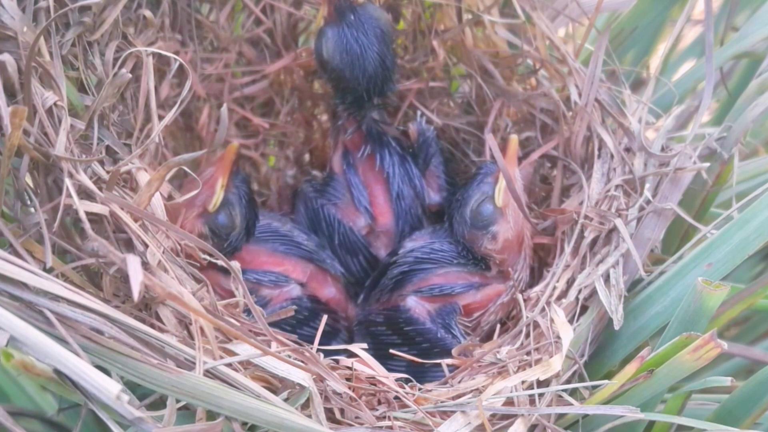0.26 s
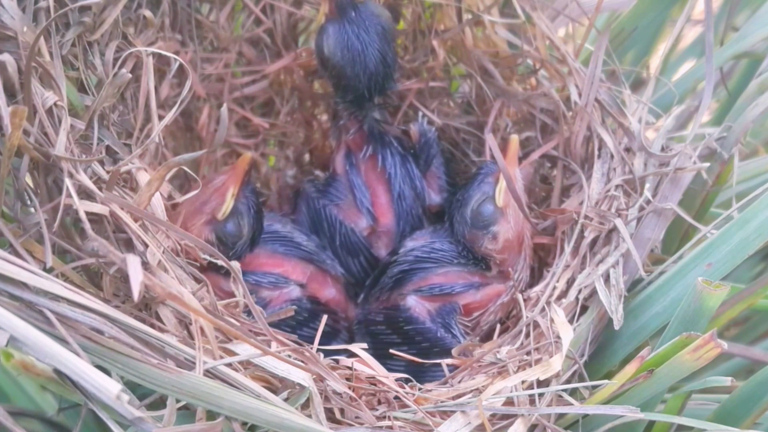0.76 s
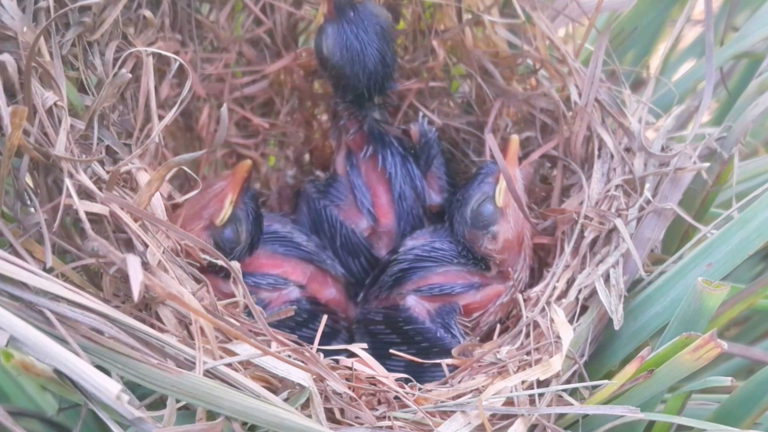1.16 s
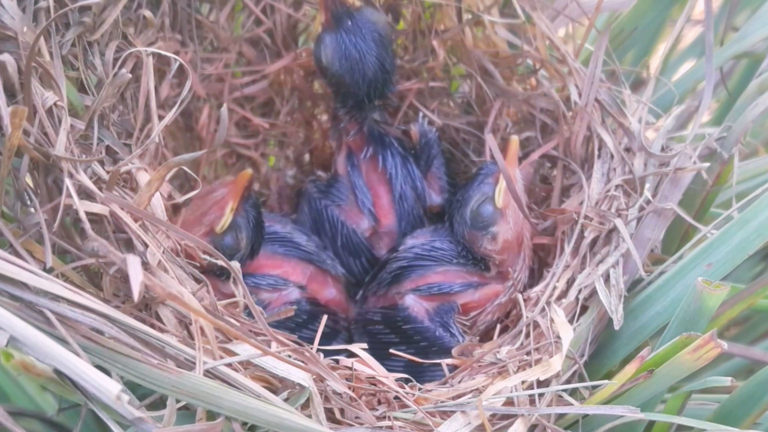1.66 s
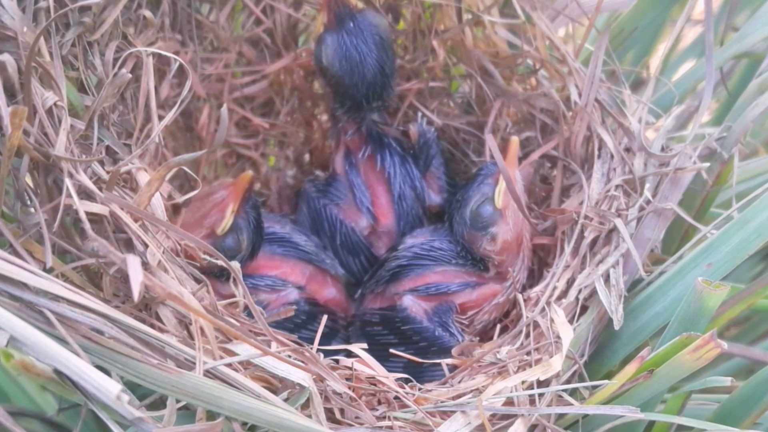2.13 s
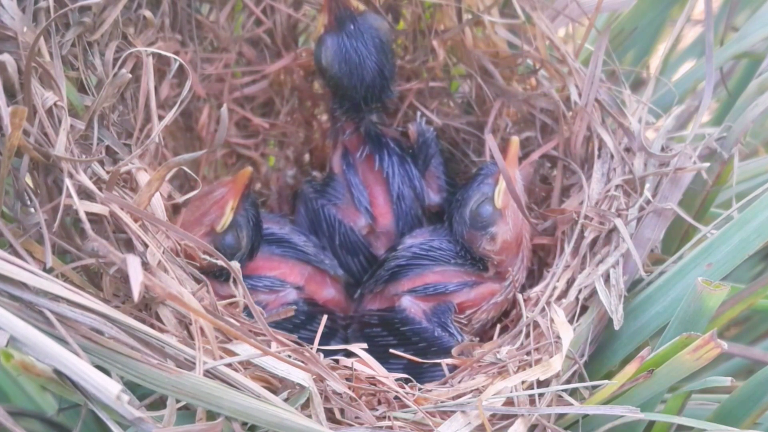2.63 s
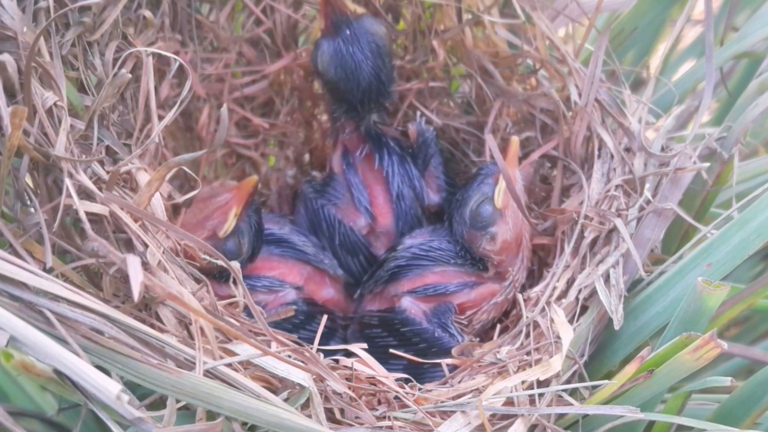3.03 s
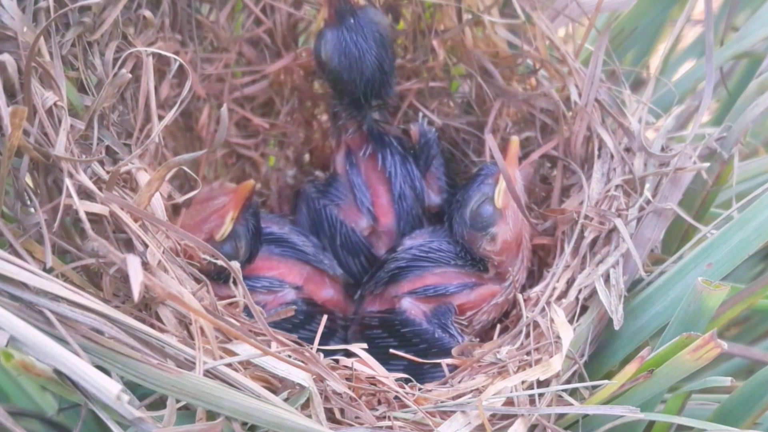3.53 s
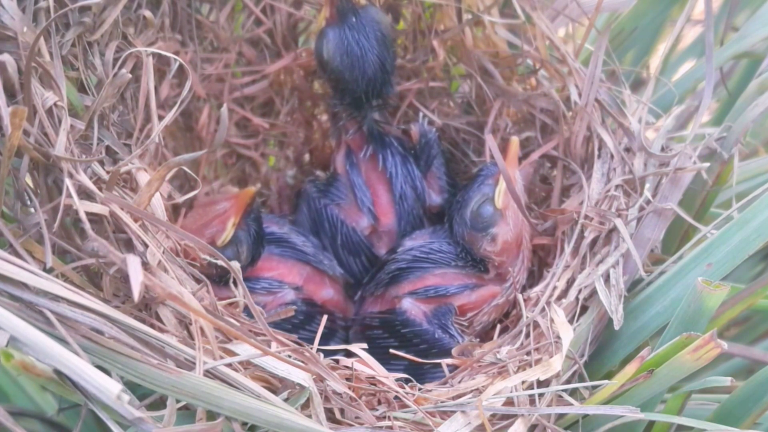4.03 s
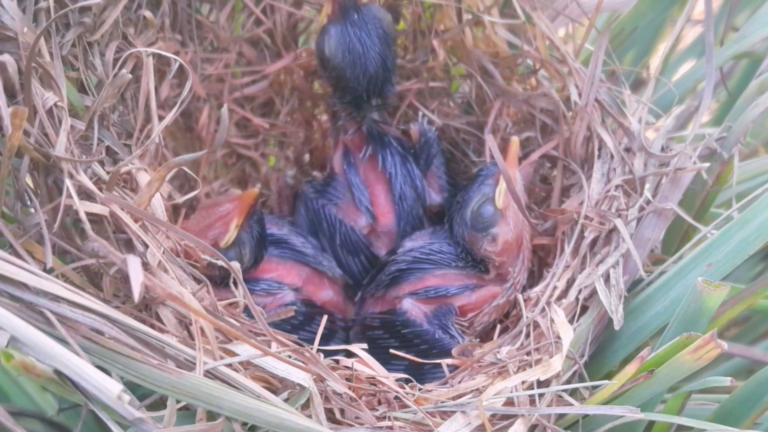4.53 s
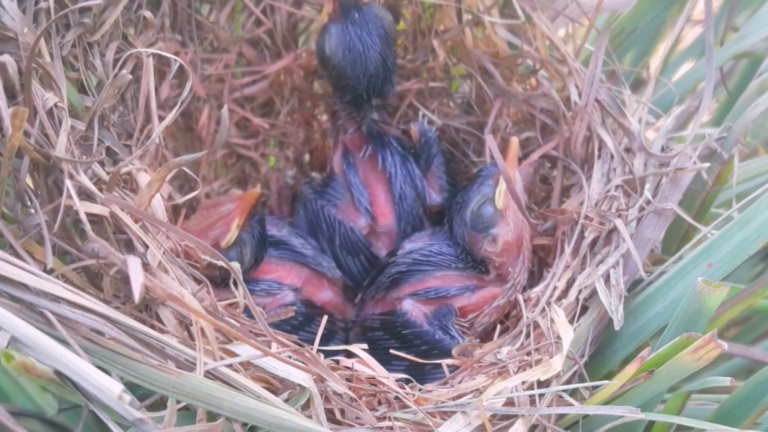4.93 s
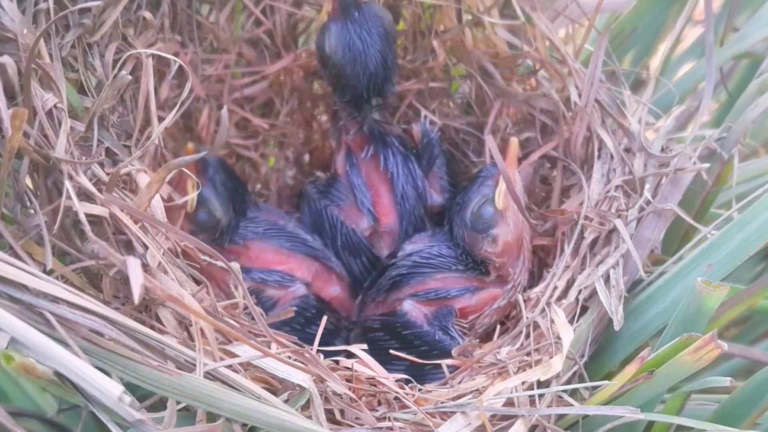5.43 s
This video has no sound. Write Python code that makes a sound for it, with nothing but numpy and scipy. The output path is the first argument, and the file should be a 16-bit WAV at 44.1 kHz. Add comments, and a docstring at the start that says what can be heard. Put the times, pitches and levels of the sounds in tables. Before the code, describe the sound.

A soft, patchy outdoor rush with low fading road noise, a very faint engine thudding about fourteen times a second and thin insect hiss. At 0.1-0.2 s dry stems snap and tiny bubbles pop; weak double peeps run from 0.3 to 0.7 s beside a light leaf brush. Quick high bird chirps glide and tumble at about 0.9, 1.6, 2.5, 3.2-3.4, 4.2 and 4.9 s. From 1.4 to 2.3 s a low, drawn-out bullfrog groan swells, pulsing and nasal, turning rough as it sags. Barely audible breathy hoots follow at 2.3-3.7 s, with a faint insect buzz from 2.9 to 3.7 s. A small frog gives short throbbing mid-pitched plucks at 4.2 and 4.5 s. Dull bumps, a snap and a scuff come at 4.7-5.0 s. A nearer, louder, shorter groan sounds from 5.16 to 5.53 s, breaking roughly and echoing off the bank.

```python
"""Bullfrog at the marsh edge

By a bird's nest a bullfrog groans twice, harmonics of a vocal pulse shaped by chest and mouth; a smaller
frog plucks throbbing sines. Small birds whistle short glides in the reeds, insects buzz and trill as struck
resonances, bubbles pop as climbing sines, dry stems snap as bursts of noise. Far off a slow engine thuds and
faint breathy hoots swell, over band noise for the rush of air and a fading road.
"""
import sys
import numpy as np
from scipy import signal
from scipy.io import wavfile
from scipy.ndimage import uniform_filter1d

SR = 44100
rng = np.random.default_rng(int(sys.argv[2]) if len(sys.argv) > 2 else 0)


def master(y):
    """Save y as 16-bit WAV."""
    cut = np.clip(np.atleast_2d(y).T, -1, 1)
    pcm = np.round(cut * 32767)  # scale
    wavfile.write(sys.argv[1], SR, pcm.astype(np.int16))


N = 250929
TIME = np.arange(N) / SR   # s


def from_db(db):
    """Decibels to gain."""
    return 10 ** (np.asarray(db) / 20)


def rms_one(x):
    """Scale to unit rms."""
    return x / np.sqrt(np.mean(x ** 2) + 1e-20)


def in_time(rows, t):
    """Each column of a curve table at times t."""
    s, *columns = np.transpose(rows)
    return [np.interp(t, s, c) for c in columns]


def at_hz(points, hz):
    """A spectrum table read on a log-frequency axis."""
    point_hz, point_db = np.transpose(points)
    return np.interp(np.log(hz), np.log(point_hz), point_db)


def band_pass(x, order, low_hz, high_hz):
    """Keep what lies between two frequencies."""
    return signal.sosfilt(signal.butter(order, [low_hz, high_hz], "band", fs=SR, output="sos"), x)


def high_pass(x, order, hz):
    """Keep what lies above a frequency."""
    return signal.sosfilt(signal.butter(order, hz, "high", fs=SR, output="sos"), x)


def drift(rate_hz, size=N):
    """Slow random wander of spread 1: noise smoothed at a twentieth of the sample rate."""
    r = np.exp(-40 * np.pi * rate_hz / SR)
    slow = signal.lfilter([1], [1, -2 * r, r * r], rng.standard_normal(size // 20 + 4002))
    settled = rms_one(slow[2000:])[2000:]
    return np.interp(np.arange(size) / 20, np.arange(size // 20 + 2), settled)


def ring(clicks, hz, t60):
    """A unit click sets a sine of height 1 ringing; it falls 60 dB in t60 seconds."""
    r, w = from_db(-60 / (t60 * SR)), 2 * np.pi * hz / SR
    return signal.lfilter([0, np.sin(w)], [1, -2 * r * np.cos(w), r * r], clicks + 1e-18)


def train(times, sizes):
    """Clicks at the given times."""
    out = np.zeros(N)
    np.add.at(out, np.clip(np.asarray(times) * SR, 0, N - 1).astype(int), sizes)
    return out


SMOOTH_ABOVE_HZ, SMOOTH_SHARE = 7500, 0.54   # the finest hiss flickers less


def rush(spectrum, patchiness):
    """Noise in third-octave bands, each flickering a little, partly together; rms 1."""
    out, together = 0, drift(24)
    edges = 25 * 2 ** (np.arange(29) / 3)
    edges = edges[edges < 1.4 * spectrum[-2][0]]
    white = rng.standard_normal((2, N))
    for k, (low, high) in enumerate(zip(edges, edges[1:])):
        band = band_pass(white[k % 2], 2, low, high)
        share = SMOOTH_SHARE if low > SMOOTH_ABOVE_HZ else 1
        flicker_db = patchiness * share * (0.38 * together + 0.27 * drift(41))
        out = out + band * from_db(at_hz(spectrum, np.sqrt(low * high)) + flicker_db)
    return rms_one(out)


# colour of the rush of air: (frequency [Hz], relative density [dB per Hz])
AIR_SPECTRUM = [(24, -35), (40, -2.5), (118, 1.5), (320, -11), (918, -18.5), (1180, -26), (2570, -23.5),
                (4000, -26), (5050, -29.5), (6820, -41.5), (8550, -37.5), (14800, -31.5), (16000, -44)]
AIR_DB = -55.5


def moving_air():
    """A steady, patchy rush of noise all around."""
    return from_db(AIR_DB) * rush(AIR_SPECTRUM, patchiness=7.0)


# colour of the road: (frequency [Hz], relative density [dB per Hz])
ROAD_SPECTRUM = [(24, -41), (40, -13), (161, 0), (334, -7.5), (973, -12), (1460, -17), (5000, -32.5),
                 (6500, -45), (11000, -120)]
# background levels: (time [s], road level [dB], insect chorus level [dB])
BACKGROUND = [(0, -45, -66), (.5, -50.5, -61.5), (1.3, -48.5, -64.5), (2.9, -51, -65.5),
              (3.9, -59.5, -67.5), (5.69, -52, -64.5)]


def road():
    """Low band noise whose level fades and returns."""
    return from_db(in_time(BACKGROUND, TIME)[0]) * rush(ROAD_SPECTRUM, patchiness=3.0)


def chorus():
    """Many far insects: dense uneven clicks in a broad band."""
    chance = 5000 * from_db(3.0 * drift(25)) / SR   # about 5000 clicks a second
    clicks = (rng.random(N) < chance) * rng.standard_normal(N)
    return from_db(in_time(BACKGROUND, TIME)[1]) * rms_one(band_pass(clicks, 3, 5650, 7550))


THUDS_PER_S, THUD_FIRST_S, THUD_DB = 14.09, 0.04276, -55


def engine():
    """Far away, one low exhaust thud per firing: a soft push rings two low resonances."""
    at = np.arange(THUD_FIRST_S, N / SR, 1 / THUDS_PER_S)
    firings = train(at, from_db(3 * rng.standard_normal(len(at))))
    push = signal.lfilter(np.hanning(300), [1], firings)
    return from_db(THUD_DB) * rms_one(ring(push, 95.0, 0.068) + 0.49 * ring(push, 165.0, 0.047))


# faint breathy hoots far off: (from [s], to [s], pitch [Hz], level at the crest [dB])
HOOTS = [(2.348, 3.062, 622, -60), (3.19, 3.723, 439, -58)]


def hoots():
    """Noise in a narrow resonance, swelling and fading."""
    out, air = 0, rng.standard_normal(N)
    for begin, end, hz, level_db in HOOTS:
        swell = np.sqrt(np.clip(4 * (TIME - begin) * (end - TIME) / (end - begin) ** 2, 0, 1))
        out = out + from_db(level_db) * swell * rms_one(ring(air, hz, 0.083))
    return out


# a bush cricket's long buzz: (from [s], to [s])
BUZZ_SPAN = (2.912, 3.726)
# wing resonances, each passed twice: (frequency [Hz], level [dB], t60 of one pass [s])
WING_MODES = [(6760, 0, .013), (6080, -11, .007), (5420, -17, .007), (10700, -21, .009), (3400, -13, .01)]
BUZZ_DB = -57.5


def bush_cricket():
    """The buzz comes in triplets of soft tooth strikes, each ringing in the wing."""
    groups = np.arange(BUZZ_SPAN[0], BUZZ_SPAN[1], .0172)
    jitter = .0007 * rng.standard_normal((len(groups), 3))   # s
    at = (groups[:, None] + [0, .0052, .0104] + jitter).ravel()
    strikes = train(at, from_db(1.5 * rng.standard_normal(len(at))))
    buzz = sum(from_db(level_db) * rms_one(ring(ring(strikes, hz, t60), hz, t60))
               for hz, level_db, t60 in WING_MODES)
    duty = np.sqrt((BUZZ_SPAN[1] - BUZZ_SPAN[0]) * SR / N)   # so that the level holds while it buzzes
    return from_db(BUZZ_DB) * duty * rms_one(buzz)


# loudness of the trill: (time [s], level [dB])
TRILL_LEVEL = [(0, -82), (1.05, -86), (1.2, -110), (3.5, -110), (3.62, -86), (4, -92), (5.69, -80)]


def trill():
    """Bursts of six fast pulses ring one high resonance."""
    bursts = np.arange(.06, N / SR, 1 / 11.81)
    pulses = train((bursts[:, None] + np.arange(6) / 133).ravel(), 1)
    return from_db(in_time(TRILL_LEVEL, TIME)[0]) * rms_one(ring(pulses, 9220, 0.017))


# dry stems snap: (time [s], level before the band filter [dB], fall to 1/e [s])
SNAPS = [(.092, -49.5, 0.014), (.2, -51, 0.0076), (.8689, -56, .003), (2.837, -54, .003),
         (4.812, -52, .002), (4.819, -43, .002)]
# leaves brush: (from [s], to [s], level before the filter [dB])
BRUSH = (0.48, .68, -68)
# something scuffs dully: (time [s], length [s], level [dB])
SCUFF = (4.928, 0.051, -51)
# soft low bumps: (time [s], peak level [dB])
BUMPS = [(1.332, -42), (1.396, -38), (4.722, -36), (4.75, -30)]


def rustles():
    """Close to the microphone: bright noise snaps, a brush of leaves, a scuff and dull ringing bumps."""
    snaps = sum(from_db(level_db) * (TIME > s) * np.exp(-np.maximum(TIME - s, 0) / fade_s)
                for s, level_db, fade_s in SNAPS)
    snaps = band_pass(snaps * rng.standard_normal(N), 2, 2500, 9000)
    begin, end, brush_db = BRUSH
    brush = (TIME > begin) * (TIME < end) * from_db(brush_db + 3.3 * drift(60))
    brush = high_pass(brush * rng.standard_normal(N), 2, 5500)
    start, length, scuff_db = SCUFF
    swell = np.sin(np.pi * np.clip((TIME - start) / length, 0, 1))
    scuff = from_db(scuff_db) * swell * rms_one(band_pass(rng.standard_normal(N), 3, 300, 2600))
    bump_s, bump_db = np.transpose(BUMPS)
    return snaps + brush + scuff + ring(train(bump_s, from_db(bump_db)), 148, 0.026)


# small bubbles burst in the water: (time [s], first pitch [Hz], level [dB])
BUBBLES = [(0.097, 914, -42.5), (0.164, 935, -50), (2.514, 555, -45)]
BUBBLE_S, BUBBLE_RISE = .008, 0.41   # length; share by which the pitch climbs


def bubbles():
    """Each bubble is a short sine that climbs."""
    out, u = np.zeros(N), np.linspace(0, 1, int(BUBBLE_S * SR))
    swell = np.sqrt(np.sin(np.pi * u ** .5).clip(0))
    for s, hz, level_db in BUBBLES:
        tone = np.sin(2 * np.pi * np.cumsum(hz * (1 + BUBBLE_RISE * u)) / SR)
        out[int(s * SR):][:len(u)] += from_db(level_db) * swell * tone
    return out


# bird levels are set at 3 kHz, before a common 3 dB lift
# single glides, lone peeps and the short rising flicks before a tumble's shaking fall:
# (time [s], length [s], first pitch [Hz], last pitch [Hz], level [dB])
SINGLE_GLIDES = [(.075, 0.061, 3680, 3560, -65), (1.072, .022, 3140, 2750, -62),
                 (2.424, 0.037, 3270, 2740, -63.5), (2.566, .012, 3140, 4320, -51),
                 (2.705, 0.025, 3570, 2850, -59.5), (2.974, 0.025, 3720, 2950, -59),
                 (3.303, .015, 3200, 3090, -60.5), (3.35, 0.013, 3650, 3950, -55),
                 (3.68, .04, 3250, 2570, -58), (4.23, 0.0083, 3360, 4440, -49),
                 (4.852, 0.046, 3400, 2900, -59), (4.919, 0.026, 2900, 2450, -63),
                 (4.948, 0.026, 2125, 2405, -58), (5.642, 0.056, 3830, 3080, -59)]
# the shaking fall that ends each tumble: (time [s], length [s], first pitch [Hz], last pitch [Hz], level [dB])
WARBLES = [(0.954, 0.021, 3360, 2890, -51), (2.576, 0.016, 3170, 2820, -53.5),
           (3.366, 0.024, 3200, 2760, -53), (4.242, .027, 3606, 2800, -48)]
# a call of two arches, each a list of: (time after the start [s], pitch [Hz])
TWO_ARCHES = [
    [(.002, 3900), (.006, 5650), (.011, 6800), (.015, 5600), (.017, 4500), (.02, 3850)],
    [(.032, 3850), (.039, 4600), (.043, 5700), (.047, 4550), (.053, 4100), (.063, 2700)],
]
# arched calls: (time [s], stretch in time [ratio], first arch level [dB], second arch level [dB])
ARCH_CALLS = [(.193, .95, -57, -51), (1.579, .99, -56, -52), (3.158, 1.0, -57, -57), (4.859, .96, -52, -53)]
# strokes of two more calls, times before stretching: (time after the start [s], length [s],
# turn [share of length], first pitch [Hz], turning pitch [Hz], last pitch [Hz], level within the call [dB])
TUMBLE = [(0, 0.016, 0.394, 3900, 6890, 3900, 0), (.016, 0.0113, 0.38, 3680, 4676, 3460, 0)]
DOUBLE_PEEP = [(0, .02, 0.36, 3930, 3370, 2810, 0.13), (.019, 0.0153, 0.38, 4320, 3410, 2670, -1)]
# where those calls sound: (time [s], level [dB], stretch in time [ratio])
TUMBLE_CALLS = [(0.918, -52, 0.93), (2.529, -53, 1.07), (3.326, -55.5, 1.05), (4.205, -54, 0.83)]
DOUBLE_CALLS = [(.325, -62, 0.81), (.396, -61.5, 0.88), (0.456, -57.5, 0.97), (.528, -57.5, 0.98),
                (.583, -57, 0.93), (.66, -58.5, 0.8)]
WARBLE_HZ, WARBLES_PER_S = 314, 141   # depth and rate of the shake
DULLING_DB = -2.5   # per octave above 3 kHz: a note swells as it falls


def bird_notes():
    """Every note as start, times after it, pitches at those times, level and depth of shake."""
    notes = [(s, [0, length], [a, b], level_db, 0) for s, length, a, b, level_db in SINGLE_GLIDES]
    notes += [(s, [0, length], [a, b], level_db, WARBLE_HZ) for s, length, a, b, level_db in WARBLES]
    for s, stretch, *levels in ARCH_CALLS:
        for level_db, path in zip(levels, TWO_ARCHES):
            times, path_hz = np.transpose(path)
            notes.append((s, stretch * times, path_hz, level_db, 0))
    for strokes, calls in [(TUMBLE, TUMBLE_CALLS), (DOUBLE_PEEP, DOUBLE_CALLS)]:
        for s, level_db, stretch in calls:
            for late, length, turn, *glide_hz, stroke_db in strokes:
                times = stretch * (late + length * np.array([0, turn, 1]))
                notes.append((s, times, glide_hz, level_db + stroke_db, 0))
    return notes


def birds():
    """Whistled glides in the reeds, slightly hoarse; each kind of call repeats its strokes."""
    out = np.zeros(N)
    hoarse = 1 + .12 * drift(70) + .42 * drift(300)
    quaver = 1 + .035 * drift(250)   # the pitch is unsteady
    for start, times, path_hz, level_db, shake_hz in bird_notes():
        first, length = int((start + times[0]) * SR), times[-1] - times[0]
        u = np.linspace(0, 1, int(length * SR))[:N - first]
        hz = np.interp(times[0] + length * u, times, path_hz)
        hz = hz + shake_hz * np.sin(2 * np.pi * WARBLES_PER_S * length * u)
        hz = hz * quaver[first:][:len(u)]
        loud = from_db(level_db + 3 + DULLING_DB * np.log2(hz / 3000))
        swell = np.sin(np.pi * u) ** .5
        out[first:][:len(u)] += loud * swell * np.sin(2 * np.pi * np.cumsum(hz) / SR)
    return out * hoarse


# small frog's notes: (time [s], level [dB], overtone against the note [dB])
PLUCKS = [(4.224, -44, -14), (4.524, -46, -27)]
# its note, then its overtone: (frequency [Hz], t60 of the breath in it [s])
PLUCK_MODES = [(1408, 0.064), (2660, .04)]
PLUCK_HOLD_S, PLUCK_T60_S = 0.022, 0.21   # the note holds, then dies


def small_frog():
    """The note throbs 58 times a second, holds and dies; the overtone comes later."""
    out, air = 0, rng.standard_normal(N)
    for s, level_db, overtone_db in PLUCKS:
        for (hz, t60), late, share_db in zip(PLUCK_MODES, [0, .042], [0, overtone_db]):
            age = np.maximum(TIME - s - late, 0)
            fall = from_db(-60 * np.maximum(age - PLUCK_HOLD_S, 0) / PLUCK_T60_S)
            throb = 1 - .4 * np.cos(2 * np.pi * 58 * age)
            push = np.tanh(age / .005) * fall * throb
            tone = np.sin(2 * np.pi * hz * TIME) + .15 * rms_one(ring(air, hz, t60))
            out = out + from_db(level_db + share_db) * push * tone
        # a breathy onset across the mids
        puff = (TIME > s) * from_db(-60 * np.maximum(TIME - s, 0) / 0.35)
        out = out + from_db(level_db - 7.0) * puff * rms_one(ring(air, 1620, 0.0047))
    return out


# the farther and the nearer bullfrog groan: (start [s], held pitch [Hz], rise time [s],
# sag after one second [Hz], pitch jumps at [s], jump [Hz], voice breaks at [s],
# throat resonance that opens after the break [Hz], its height [dB], resting centre of the mouth resonance [Hz],
# resonance heard as the mouth first opens [Hz], its height [dB])
GROAN_FAR = (1.38, 79.7, .07, 17.5, 2, 0.345, 2.02, 880, 3.7, 1270, 1210, 3)
GROAN_NEAR = (5.162, 83.4, 0.0375, 170, 5.35, 3.9, 5.42, 660, 14, 1013, 1345, 21)
# effort of each groan: (time [s], chest level [dB], mouth level [dB], centre of the mouth resonance [Hz])
EFFORT_FAR = [(1.38, -57, -54, 1240), (1.47, -48.5, -46, 1200), (1.532, -44.5, -45, 1320),
              (1.834, -41.5, -40.5, 1256), (1.904, -39.5, -44, 1310), (1.992, -39.5, -39, 1300),
              (2.036, -47.5, -42.5, 1308), (2.142, -35, -41.5, 1270), (2.272, -48, -47, 1278),
              (2.34, -67, -56, 1260)]
EFFORT_NEAR = [(5.162, -62, -67, 955), (5.173, -57, -45, 920), (5.214, -44, -41, 996),
               (5.342, -47.5, -30.5, 1040), (5.39, -40, -32.5, 950), (5.465, -37, -30.5, 1023),
               (5.512, -46, -33.5, 1030), (5.534, -56, -47, 1020)]
# colour of the upper harmonics: (frequency [Hz], relative level [dB])
MOUTH_FAR = [(500, -20.5), (790, -23), (865, -2.5), (950, -4), (1020, -11), (1185, -13), (1270, 7.5),
             (1380, -12), (1550, -5.5), (1670, -16.5), (2040, -14.5), (2145, -5), (2220, -21),
             (2310, -13.5), (2600, -23.5), (3100, -20)]
MOUTH_NEAR = [(420, -14.5), (580, -19.5), (750, -4.5), (870, -8.5), (990, 2.5), (1170, -1.5), (1330, -20.5),
              (1580, -17.5), (1660, -11.5), (1750, -23), (1900, -12.5), (2000, -24), (2580, -24),
              (2890, -27.5), (3200, -64)]
# the five lowest harmonics: (relative level [dB])
CHEST_LINES = [-12, -12.5, 4, -9, -19]
SCOOP_HZ, SAG_POWER, JUMP_S = 7, 3.5, 0.047   # scoops up from below, sags ever faster, jumps quickly
CLEAR, ONSET_ROUGH, BROKEN = .015, .2, .45   # roughness 0-1: held, at the start, after the break
ROUGHEN_S, BREAK_S = .1, .05   # time to clear, time the voice takes to break
THROAT_OCTAVES, OPENING_S = 0.11, 0.059   # width of the passing resonances; how long the first one lasts
HIGHS_DB_PER_HZ = 1   # the top bands fade as the pitch falls below the held note
PHASE_SPREAD = 1.0   # radians: the lines nearly line up into pulses
PHASE_WANDER = .55   # radians by which reflections turn each upper line


def groan(call, effort, mouth, waver):
    """Harmonics of the vocal pulse through chest and mouth; roughness smears each line into noise."""
    (start, held_hz, rise_s, sag_hz, jump_s, jump_hz, break_s,
     throat_hz, throat_db, rest_hz, first_hz, first_db) = call
    out, first = np.zeros(N), int(start * SR)
    t = np.arange(first, min(N, int(effort[-1][0] * SR))) / SR
    age = np.maximum(t - start, 0)
    pitch = held_hz - SCOOP_HZ * np.exp(-age / rise_s) - sag_hz * age ** SAG_POWER
    pitch = pitch + jump_hz * np.clip((t - jump_s) / JUMP_S, 0, 1)
    phase = 2 * np.pi * np.cumsum(pitch) / SR
    rough = np.interp(t, [start, start + ROUGHEN_S, break_s, break_s + BREAK_S],
                      [ONSET_ROUGH, CLEAR, CLEAR, BROKEN])
    broken = np.clip((t - break_s) / BREAK_S, 0, 1)
    chest_db, mouth_db, mouth_hz = in_time(effort, t)
    parts = [0, 0]   # chest lines, mouth lines
    for k in range(1, 39):
        upper, hz = int(k > 5), k * pitch
        smear = np.sqrt(1 - rough) + np.sqrt(rough) * min(k / 9, 1) * drift(44, size=len(t))
        if upper:
            # highs come with effort
            opening = 0.19 * (mouth_db - mouth_db.max()) * np.maximum(np.log2(hz / 1300), 0)
            fading = HIGHS_DB_PER_HZ * np.clip(held_hz - pitch, 0, 4) * (k * held_hz > 1800)
            throat = throat_db * broken * np.exp(-(np.log2(hz / throat_hz) / THROAT_OCTAVES) ** 2)
            from_first = (np.log2(hz / first_hz) / THROAT_OCTAVES) ** 2
            first_open = first_db * np.exp(-(age / OPENING_S) ** 2 - from_first)
            # only the mouth resonance moves
            shift = (rest_hz / mouth_hz) ** np.exp(-(np.log2(hz / rest_hz) / .25) ** 4)
            level = at_hz(mouth, hz * shift) + opening - fading + throat + first_open
        else:
            level = CHEST_LINES[k - 1]
        # reflections shift the lines' balance
        level = level + (upper + 0.53) * waver * drift(8.5, size=len(t))
        turn = PHASE_SPREAD * rng.standard_normal() + upper * PHASE_WANDER * drift(2.44, size=len(t))
        parts[upper] = parts[upper] + from_db(level) * smear * np.cos(k * phase + turn)
    # level each part, so that the effort table alone sets its loudness
    chest, voice = [p / np.sqrt(uniform_filter1d(p ** 2, 4000)) for p in parts]
    fade = np.clip(np.minimum(t - t[0], t[-1] - t) / 0.014, 0, 1)
    out[first:first + len(t)] = fade * (from_db(chest_db) * chest + from_db(mouth_db) * voice)
    return out


def outdoors(x, t60):
    """Scattered echoes from reeds and banks, dying away; unit energy."""
    t = np.arange(int(.5 * SR)) / SR
    tail = rng.standard_normal(len(t)) * from_db(-60 * t / t60) * (t > .006)
    return signal.fftconvolve(x, tail / np.sqrt(np.sum(tail ** 2)))[:N]


BANK_ECHO_S, BANK_ECHO_DB = .1, -13


def bank_echo(near):
    """A bank throws the nearer groan back, late and scattered."""
    back = np.r_[np.zeros(int(BANK_ECHO_S * SR)), near][:N]
    return from_db(BANK_ECHO_DB) * outdoors(back, t60=0.064)


HISS_SIDE_DB = -76   # before the high-pass


def scene():
    """Birds and bullfrogs with their echoes, the small frog and insects without, over the background."""
    background = moving_air() + road() + chorus() + engine() + hoots()
    small_sounds = bush_cricket() + trill() + rustles() + bubbles()
    songs = birds()
    songs = songs + from_db(-7) * outdoors(songs, t60=.07)   # nearby reeds blur each note
    near = groan(GROAN_NEAR, EFFORT_NEAR, MOUTH_NEAR, waver=1.5)
    groans = near + groan(GROAN_FAR, EFFORT_FAR, MOUTH_FAR, waver=1.2)
    echoes = from_db(-10) * outdoors(groans, t60=.55) + bank_echo(near)
    echoes = echoes + from_db(-9.0) * outdoors(songs, t60=0.29)
    mid = background + small_sounds + songs + small_frog() + groans + echoes
    # only the finest hiss differs left to right
    side = from_db(HISS_SIDE_DB) * high_pass(rng.standard_normal(N), 2, 9000)
    return np.array([mid + side, mid - side])


CUTOFF_HZ = 15740


def record(dry):
    """The microphone drops the deepest bass; the top is cut steeply."""
    out = high_pass(dry, 4, 42)
    return signal.sosfilt(signal.ellip(12, .5, 60, CUTOFF_HZ, fs=SR, output="sos"), out)


dry = scene()
out = record(dry)
master(out)
```